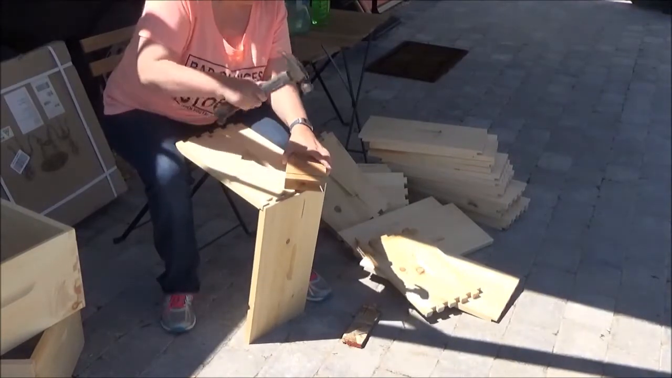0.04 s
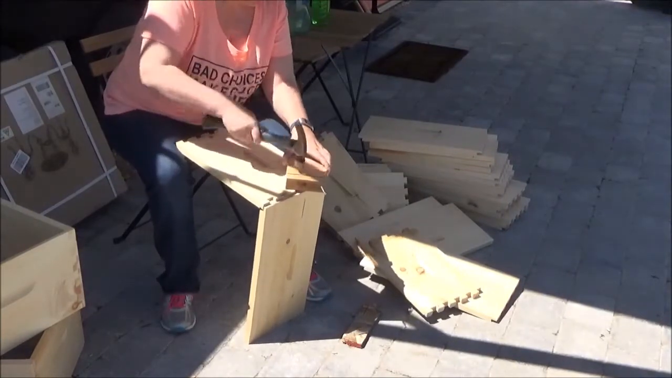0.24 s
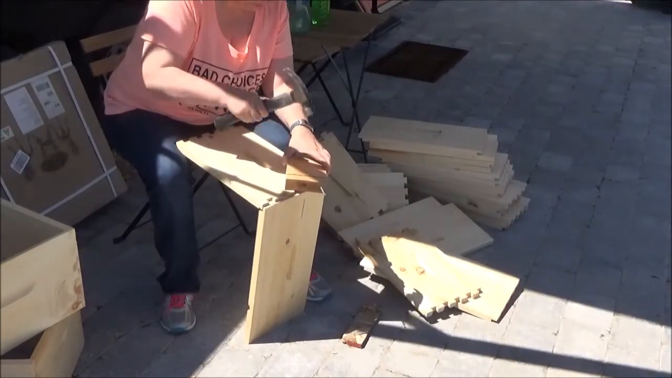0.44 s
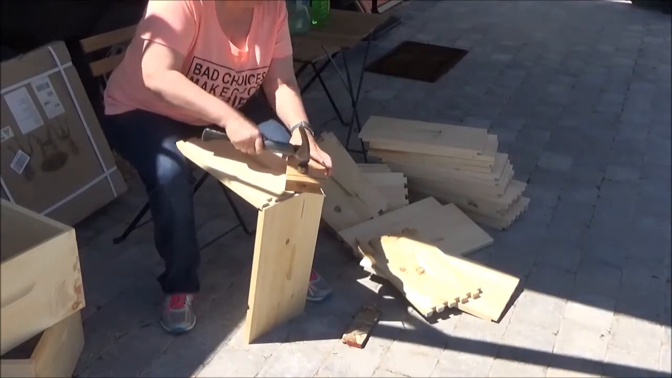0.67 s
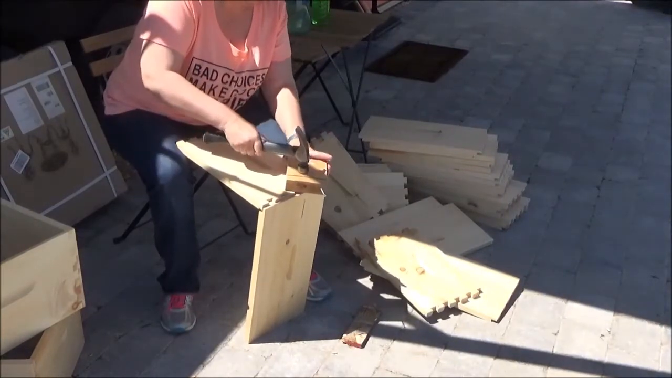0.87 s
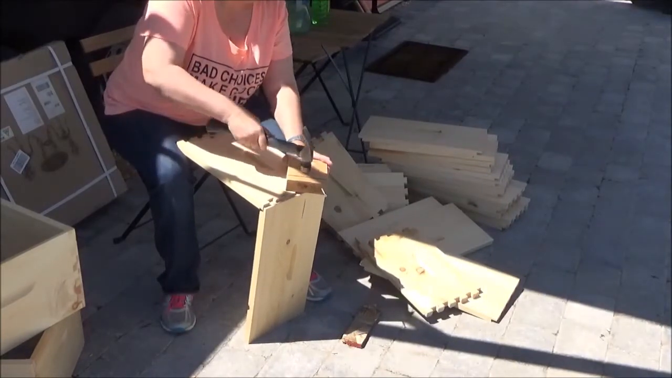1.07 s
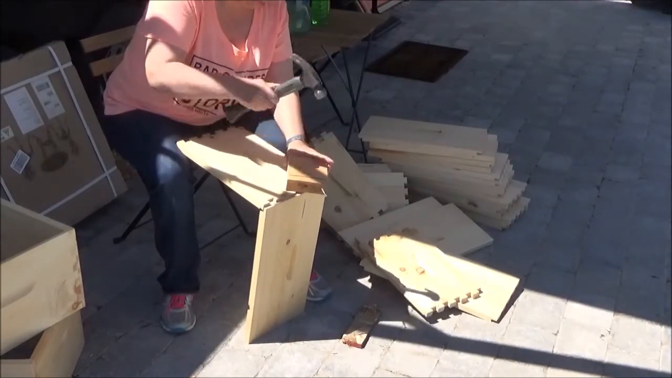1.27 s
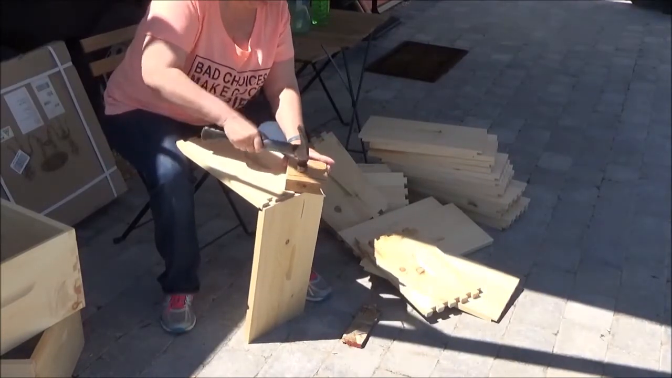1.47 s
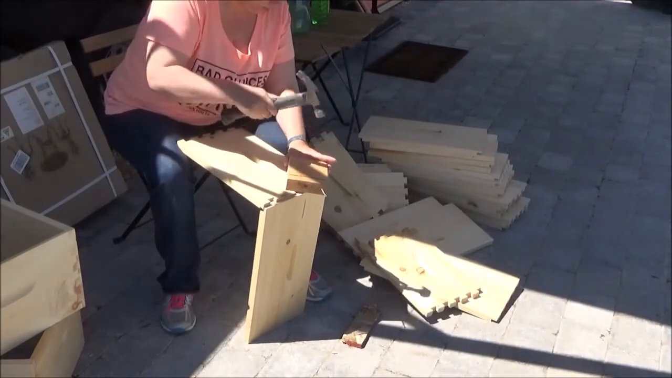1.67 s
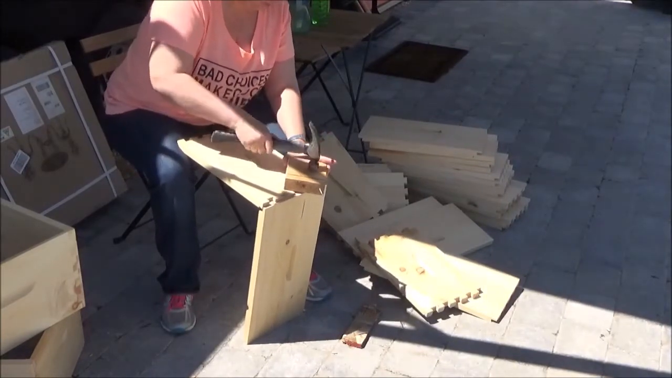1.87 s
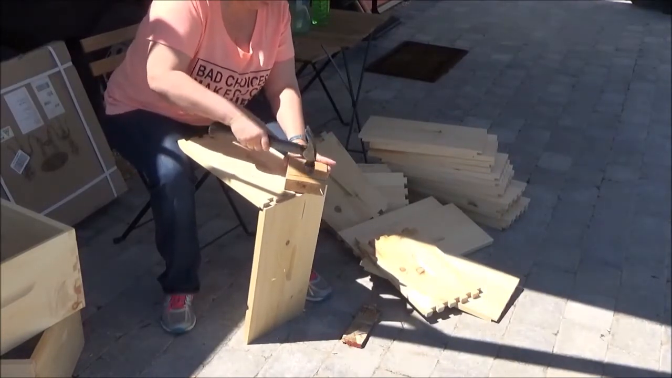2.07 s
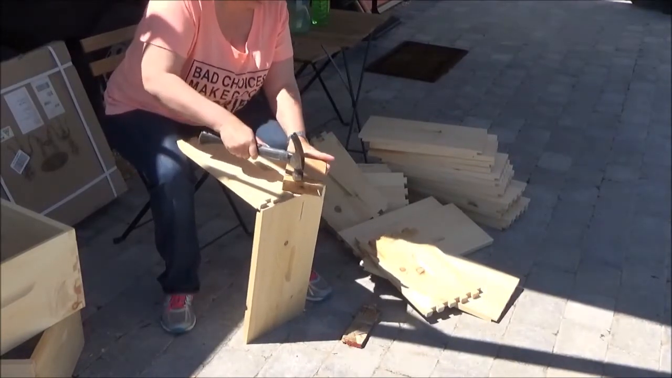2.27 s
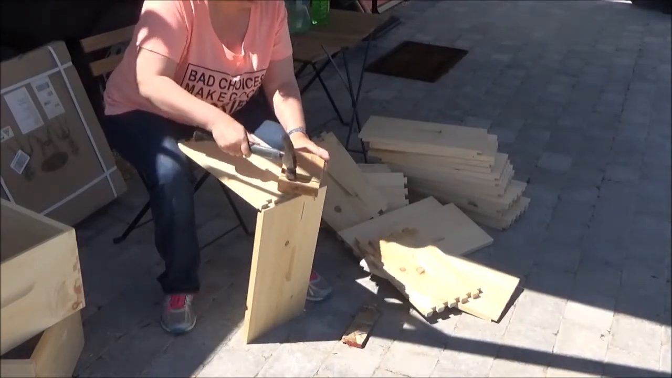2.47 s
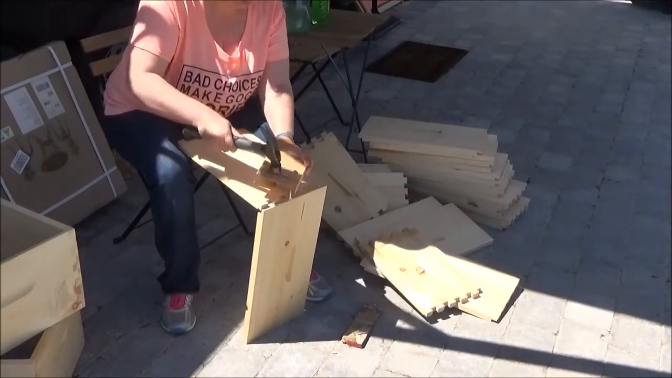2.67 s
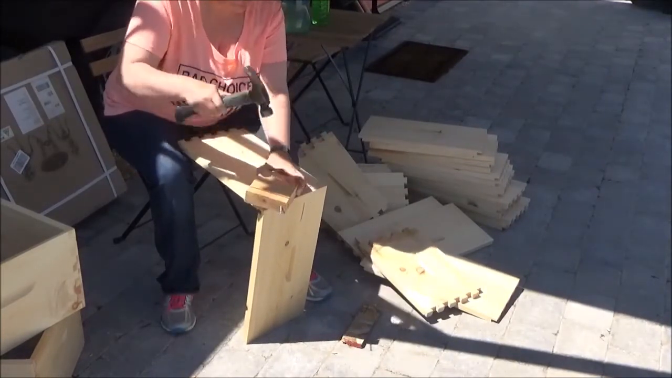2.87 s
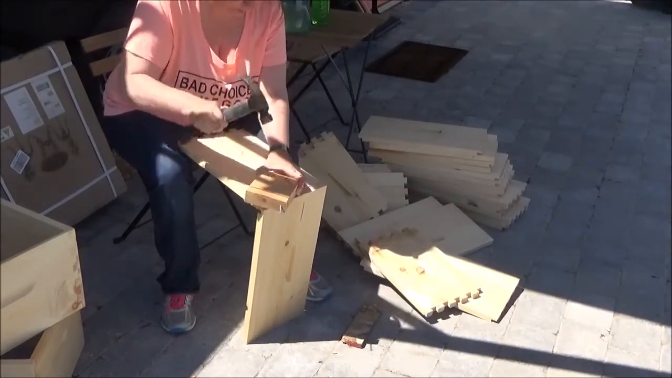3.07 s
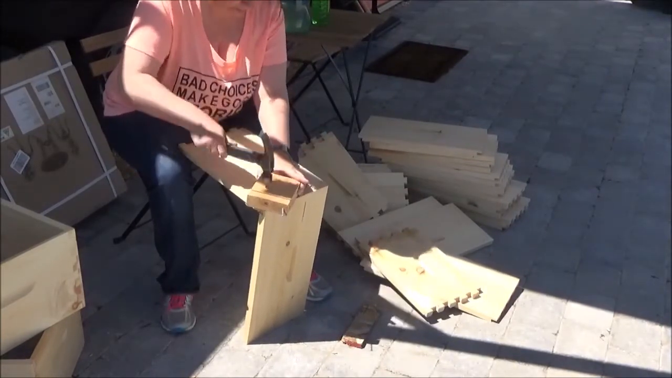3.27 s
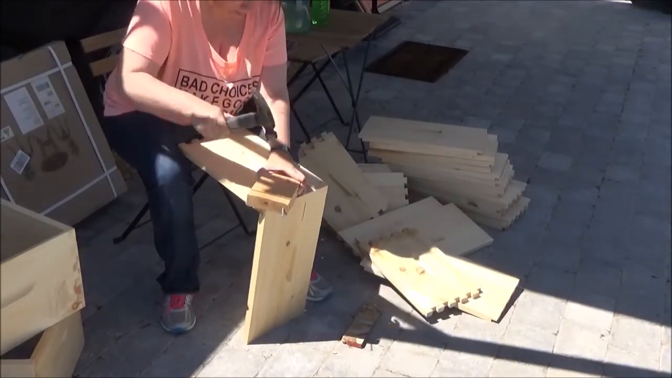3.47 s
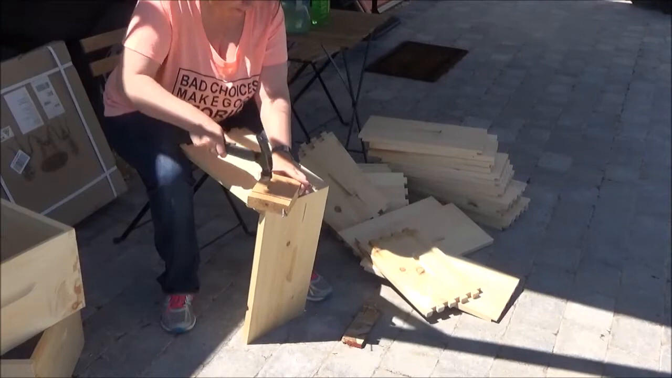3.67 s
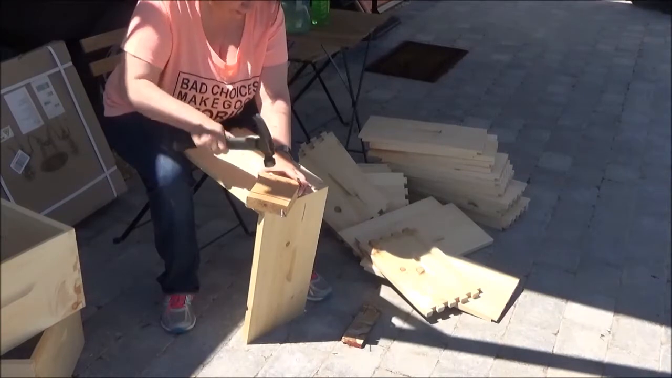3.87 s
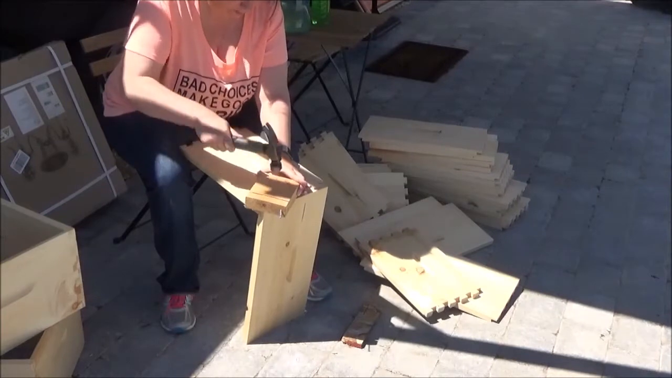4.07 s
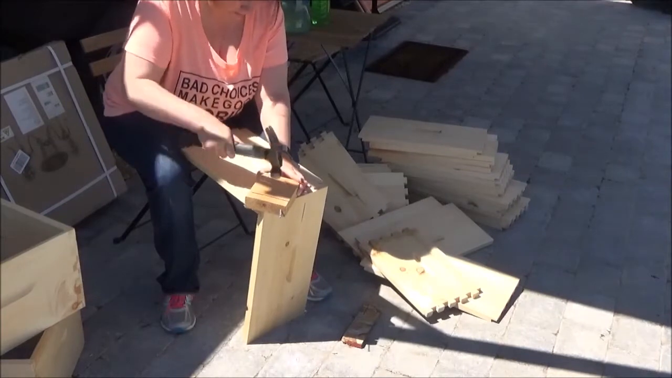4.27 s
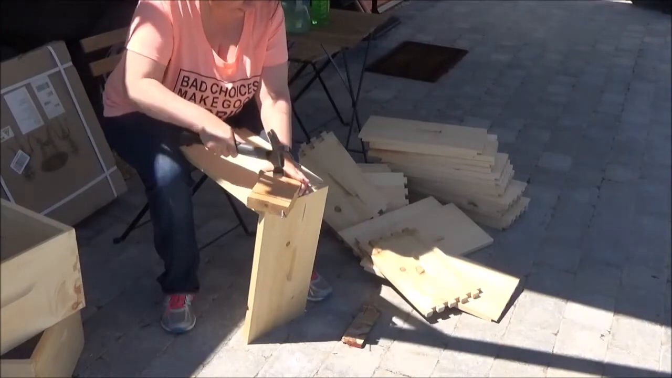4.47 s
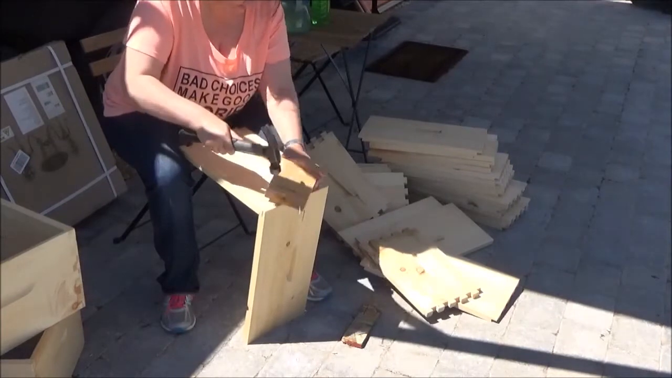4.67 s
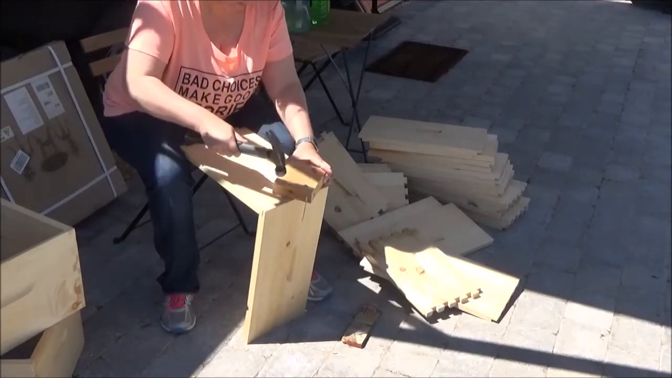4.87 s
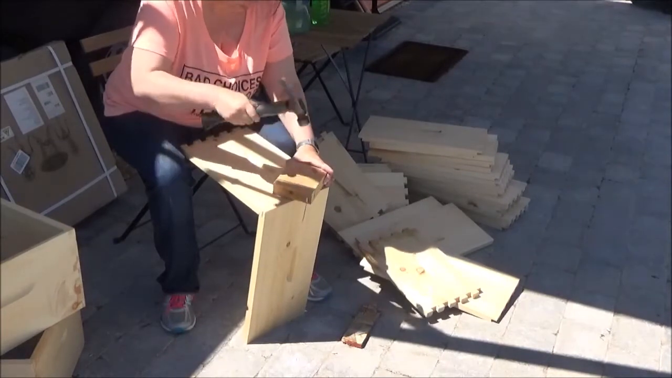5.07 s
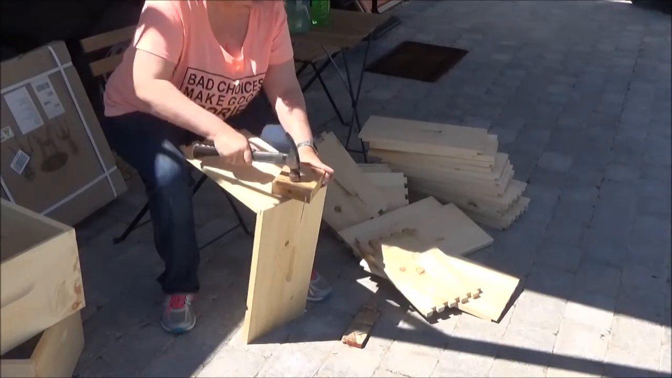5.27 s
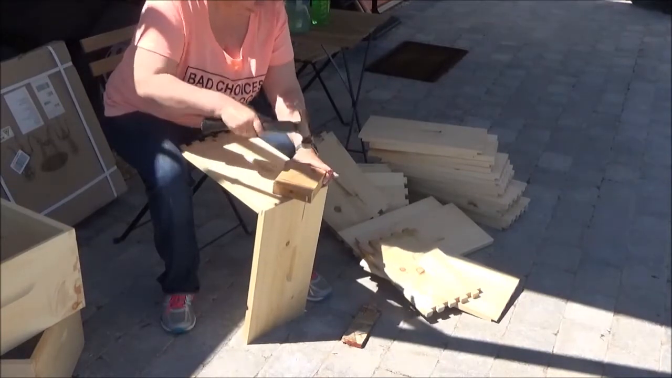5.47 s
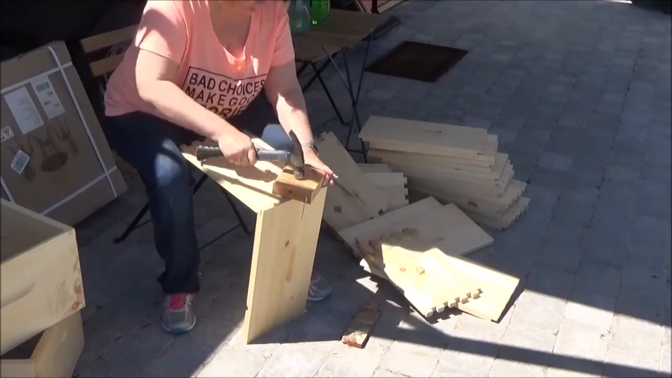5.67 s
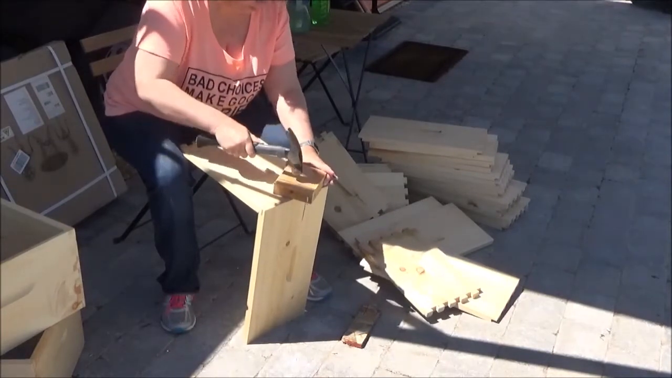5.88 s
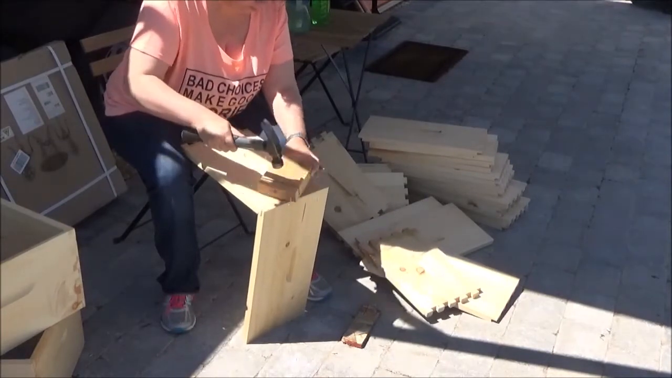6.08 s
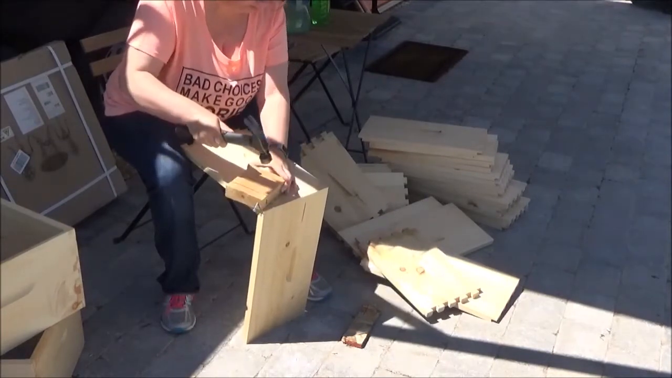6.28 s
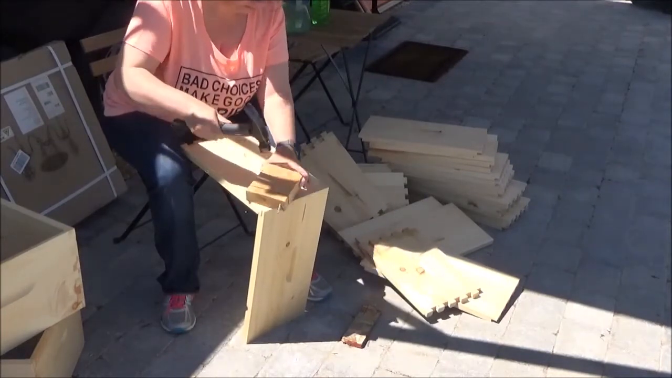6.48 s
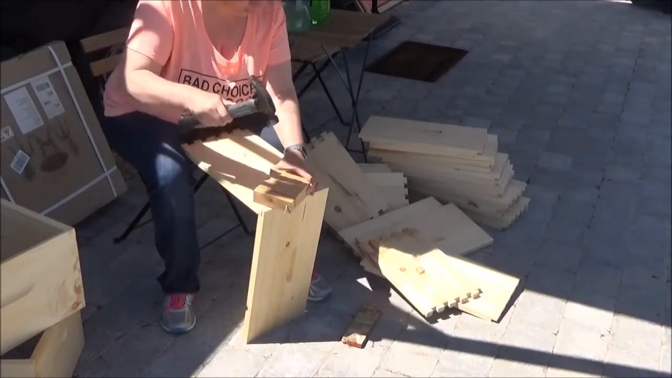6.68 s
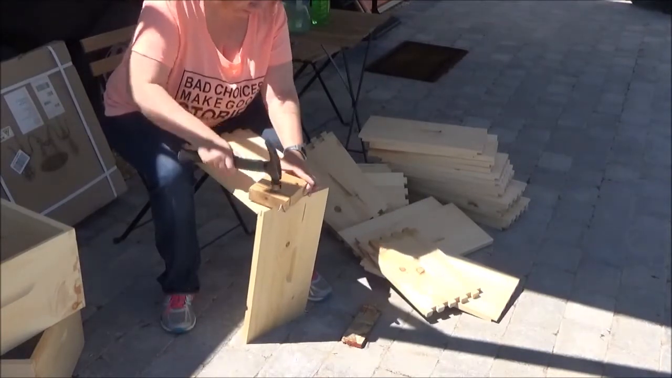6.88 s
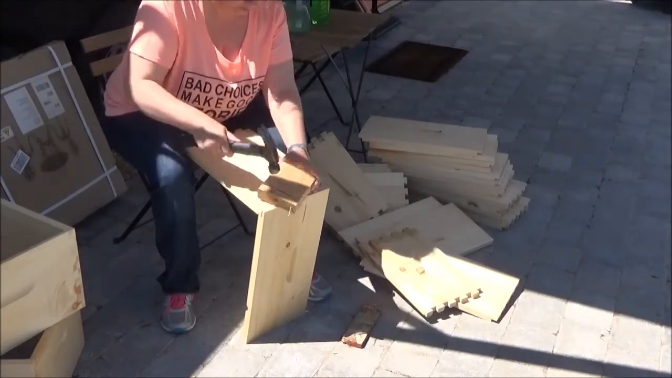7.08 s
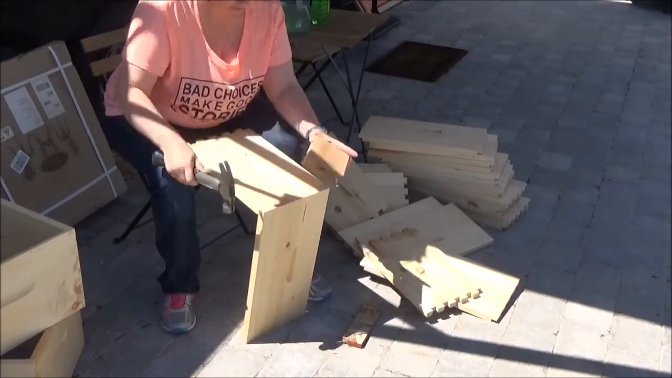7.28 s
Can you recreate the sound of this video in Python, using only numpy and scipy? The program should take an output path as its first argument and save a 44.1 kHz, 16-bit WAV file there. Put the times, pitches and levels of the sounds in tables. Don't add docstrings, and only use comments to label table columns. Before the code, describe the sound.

Sharp, hard woody hammer blows, unevenly spaced, ring in a close reflective space; a loose block bounces and scrapes between them over quiet hiss.

```python
import sys
import numpy as np
from scipy import signal
from scipy.fft import rfft, irfft, next_fast_len
from scipy.io import wavfile
from scipy.ndimage import map_coordinates

SR = 44100
rng = np.random.default_rng(int(sys.argv[2]) if len(sys.argv) > 2 else 0)


def to_wav(sig):
    pcm = np.clip(np.atleast_2d(sig), -1, 1) * 32767
    pcm = np.round(pcm).astype(np.int16)
    wavfile.write(sys.argv[1], SR, pcm.T)


def volts(x):
    e = np.asarray(x, float) / 20
    return 10 ** e


N = 323686

# time in seconds, strength in dB,
# steel crack in dB, box boom in dB, top board tone in Hz.
BLOWS = [
    [(.141, -16, 2, 7, 720), (.532, -11.5, 4.5, -11, 940), (1.432, -14.5, 4, -6, 700),
     (1.83, -15, 0.5, -6.5, 640)],
    [(3.152, -15, 3, 3, 480)],
    [(3.556, -18.5, -1, 0, 508), (3.931, -16, 1.5, 5, 577), (4.317, -14.5, 2, 4, 540)],
    [(5.283, -13.5, 6, -8, 560), (5.676, -18.5, 6.5, 9, 450)],
    [(6.859, -13, -1.5, -2, 600)],
]
# tone in Hz, width in Hz, level in dB.
WOOD = [
    [(600, 100, -4), (1750, 200, -10), (2020, 120, -4), (2380, 60, -10), (2914, 200, -5), (4900, 60, -15)],
    [(1060, 150, 4), (1280, 200, 6), (3500, 40, -16), (4300, 200, -18), (5100, 40, -15)],
    [(1200, 50, 3), (1500, 84, -0.5), (1774, 80, -4), (2010, 60, -9), (3570, 100, -14), (5050, 40, -18)],
    [(1555, 70, 1), (1850, 80, -2), (2160, 60, -5), (2360, 40, -12.5), (3150, 120, -4), (4360, 60, -20)],
    [(1230, 60, -1), (1560, 150, 1), (2110, 110, -2), (2400, 60, -8), (3050, 110, -21)],
]
# damped tone in Hz, width in Hz,
# share taken away from 0 to 1, top board level in dB, build-up of the box in seconds.
DAMPING = [(1200, 350, .55, 1.5, .01), (780, 250, .2, 1.5, .004), (850, 300, .1, -1, .017),
           (760, 250, .6, 1.5, .02), (950, 200, .45, -5, .006)]
# frequency in Hz, level in dB per Hz.
KNOCK = [(50, -51), (171, -13), (281, -9), (451, 0), (720, 1), (1200, -2), (2210, -3), (3000, -5),
         (4260, -10.5), (5600, -17.5), (6250, -32.5), (6990, -25), (11000, -25), (14000, -25)]
# time in seconds, peak in dB, board tone in Hz, hardness in dB.
TOUCHES = [(2.033, -39, 708, -23), (2.19, -19, 700, -3), (2.214, -23, 790, -13), (2.228, -29, 340, -10.5),
           (2.857, -11, 600, -8), (2.867, -11, 600, -18), (2.894, -19.5, 600, 4.5), (2.913, -29, 594, 2.5),
           (2.955, -24, 613, -8), (2.976, -34.5, 505, -16), (3.131, -52, 704, 11.5), (3.357, -52, 563, -13),
           (4.305, -41, 1410, -10), (4.845, -33, 586, -7.5), (4.87, -13, 655, -16), (5.155, -52, 796, 3),
           (6.211, -38, 342, -11), (6.233, -43, 350, -14), (6.255, -42, 400, -9), (6.293, -28.5, 603, -20),
           (6.647, -54, 500, -10), (6.697, -47, 380, -14), (6.714, -39, 446, -10), (6.92, -11, 680, -20),
           (7.042, -33.5, 603, -11)]
# time in seconds, peak in dB, tone in Hz.
THUDS = [(2.228, -30, 270), (2.235, -37, 186), (2.856, -21, 375), (2.971, -39, 174), (4.872, -38, 180)]
# tone in Hz, level in dB, time to fall 60 dB in seconds.
BLOCK_TONES = [(569.7, -5, 0.067), (400, -15, 0.055), (934, -12.5, 0.069), (1288, -14, 0.048),
               (1655, -6, 0.055), (2130, -11, 0.02), (2394, -2, 0.02), (2953, -9, 0.031),
               (4100, -17.5, 0.024)]
# start in seconds, length in seconds, board tone in dB, block tone in dB.
STROKES = [(6.151, 0.15, -47, -51), (6.4, .075, -62, -48), (6.465, 0.064, -55, -50)]
# frequency in Hz, time to fall 60 dB in seconds.
SHED_DECAY = [(150, 0.26), (600, 0.28), (2500, 0.26), (6000, 0.28), (10000, 0.26)]
# delay in seconds, level in dB, time to fall 60 dB in seconds, lowest Hz returned.
ECHOES = [(.066, -11, 0.03, 300), (0.092, -17, 0.026, 1500), (.144, -19.5, 0.088, 4040),
          (.243, -34, 0.72, 1200)]
# time in seconds, nearness in dB.
TRAFFIC = [(0, 4.5), (.8, 0.5), (1.22, 2.5), (1.45, -1), (2.8, 2), (4.7, -5.5), (7.34, 0)]
# frequency in Hz, level in dB per Hz.
HUM = [(12, -50), (20, -20), (43, 7), (65, 3), (78, -1), (92, 21.5), (125, -3), (150, -11), (200, -41),
       (330, -120)]
# frequency in Hz, level in dB per Hz.
HISS = [(60, -16), (130, -1), (220, -5.5), (400, -3), (700, -2), (1500, -7), (3000, -9), (5000, -9),
        (5600, -14.5), (6200, -23), (7000, -15.5), (11000, -22), (12000, -15.5)]
# frequency in Hz, likeness from 0 to 1.
HISS_ALIKE = [(60, 0.99), (220, 0.97), (840, 0.74), (3130, 0.64), (11700, 0.58)]
# frequency in Hz, left over right in dB.
LEFT_DB = [(110, -0.5), (500, 1.34), (2000, 2), (9000, -0.5)]


def unit(x):
    return x / np.sqrt(np.mean(x ** 2) + 1e-20)


def along(points, hz):
    f, value = np.transpose(points)
    return np.interp(np.log(hz + 1), np.log(f + 1), value)


def curves(rows):
    s, *columns = np.transpose(rows)
    return [np.interp(np.arange(N) / SR, s, column) for column in columns]


def filtered(x, response):
    m = next_fast_len(x.shape[-1] + 8192)
    spectrum = rfft(x, m) * response(np.fft.rfftfreq(m, 1 / SR))
    return irfft(spectrum, m)[..., :x.shape[-1]]


def causal(db):
    cepstrum = irfft(np.log(volts(db) + 1e-6))
    cepstrum[1:len(db) - 1] *= 2
    cepstrum[len(db):] = 0
    return np.exp(rfft(cepstrum))


def tone(f, hz, width_hz):
    return 1j * f * width_hz / (hz * hz - f * f + 1j * f * width_hz)


def pair(size, alike):
    def shares(hz):
        turn = np.arccos(np.clip(along(alike, hz), -1, 1)) / 2
        return np.array([np.cos(turn), np.sin(turn)])

    mid, side = filtered(rng.standard_normal((2, size)), shares)
    return np.array([mid + side, mid - side])


def hammer():
    out = np.zeros((2, N))
    for modes, damping, blows in zip(WOOD, DAMPING, BLOWS):
        for blow in blows:
            add_blow(out, modes, damping, blow)
    return out


def add_blow(out, modes, damping, blow):
    t = np.arange(SR) / SR
    dip_hz, dip_width_hz, share, board_db, build_s = damping
    s, db, steel_db, boom_db, board_hz = blow
    rung = [(hz, width_hz, level + 2.5 * rng.normal()) for hz, width_hz, level in modes]
    rung = [(board_hz, 130, board_db)] + rung

    burst = volts(-5 - 60 * t / 0.059) * rng.standard_normal(SR)
    answer = shed([(110, 0.87), (300, 0.92), (650, 0.91), (7000, 0.83)], length=1.046)
    sound = (burst + answer) * (1 - np.exp(-t / 0.0011))
    sound *= 1 - 0.62 * np.exp(-t / build_s)

    def wood(f):
        gain = 1 - min(share, 0.9) * tone(f, dip_hz, dip_width_hz)
        gain = gain + volts(boom_db) * tone(f, 182, 62)
        for hz, width_hz, level in rung:
            over_knock_db = min(level + 1.2 - along(KNOCK, hz), 9 - hz / 450)
            gain = gain + volts(over_knock_db) * tone(f, hz, max(width_hz, 0.029 * hz))
        return gain

    def colour(f):
        steel = steel_db * np.clip((f - 3200) / 3800, 0, 1)
        return causal(along(KNOCK, f) + steel) * wood(f)

    add(out, s - 0.0011, volts(db + 13.5) * filtered(sound, colour))
    # a 38 Hz sway, drifting apart left and right
    drift = np.array([[0], [0.9]]) * (1 - np.exp(-t / 0.01))
    add(out, s, volts(db - 37 - 60 * t / 0.12) * np.sin(2 * np.pi * 38 * t + drift))


def block():
    out = np.zeros((2, N))
    for s, db, hz, hard_db in TOUCHES:
        board_t60 = max(0.062 + 0.0011 * (db + 13), 0.02)
        add_touch(out, s, db, hz, hard_db, board_t60, contact_s=0.0025)
    for s, db, hz in THUDS:
        add_touch(out, s, db, hz, hard_db=-25, board_t60=16.6 / hz, contact_s=0.0043)

    out = filtered(out, lambda f: (1j * f / (90 + 1j * f)) ** 2 / (1 + 1j * f / 6500) ** 2)
    answer = shed([(110, 0.97), (7000, 0.24)], length=0.57)
    answer /= np.linalg.norm(answer[0])
    return out + volts(-10) * signal.fftconvolve(out, answer, axes=1)[:, :N]


def add_touch(out, s, db, board_hz, hard_db, board_t60, contact_s):
    t = np.arange(SR // 4) / SR
    ring = np.sin(2 * np.pi * board_hz * t) * volts(-60 * t / board_t60)
    for hz, level, t60 in BLOCK_TONES:
        bright = (hard_db + 5.5) * np.clip((hz - 750) / 850, 0, 1)
        waver = np.cumsum(rng.standard_normal(len(t))) * 0.18 * np.clip((hz - 700) / 1000, 0, 1)
        fade = volts(level + bright + rng.normal(0, 1.4) - 60 * t / t60)
        ring += fade * np.sin(2 * np.pi * hz * t * rng.normal(1, 0.031) + waver)
    click = filtered(rng.standard_normal(len(t)),
                     lambda f: tone(f, 1160, 1100) * tone(f, 1300, 2800) * tone(f, 2300, 6000))
    knock = ring + volts(hard_db + 2 - 60 * t / 0.065) * click
    knock *= 1 - np.exp(-t / contact_s)
    add(out, s - 0.0005, volts(db + 3.5) * np.array([knock, knock]))


def slide():
    t, out = np.arange(N) / SR, np.zeros(N)
    unevenness = map_coordinates(rng.standard_normal(N // 400 + 4), [np.arange(N) / 400])
    slips = rng.standard_normal(N) * volts(3 * unevenness)
    for s, length, *levels in STROKES:
        stroke = np.clip(np.minimum(t - s, s + length - t) / 0.015, 0, 1)
        for db, hz, width_hz in zip(levels, (605, 1320), (120, 150)):
            scrape = unit(filtered(slips, lambda f: tone(f, hz, width_hz) ** 2))
            out += stroke * volts(db - 5.5) * scrape
    return out


def shed(alike, length=1):
    t = np.arange(SR) / SR
    hz, frame_s, z = signal.stft(pair(SR, alike), SR, nperseg=256)
    decay = volts(-60 * frame_s / length / along(SHED_DECAY, hz)[:, None])
    tail = signal.istft(z * decay, SR, nperseg=256)[1][:, :SR]
    jumps = np.repeat(rng.standard_normal(SR // 40 + 1), 40)[:SR]
    tail *= volts(3.6 * jumps * np.exp(-t / 0.13))
    far = pair(SR, alike)
    for s, db, t60, low_hz in ECHOES:
        age = np.maximum(t - s, 0) / t60
        swell = np.minimum(age / 0.029, 1)
        tail += volts(db - 60 * age) * swell * filtered(far, lambda f: f / np.hypot(f, low_hz))
    return tail


def add(track, s, sound):
    part = track[:, round(s * SR):][:, :sound.shape[1]]
    part += sound[:, :part.shape[1]]


def air():
    near_db, = curves(TRAFFIC)
    hum_db = -66 + near_db
    hiss_db = -49 + 0.2 * near_db
    swell = map_coordinates(rng.standard_normal(N // 5000 + 4), [np.arange(N) / 5000])
    hum_noise = pair(N, [(32, 0.66), (60, 1.0), (95, 0.97)])
    hum = unit(filtered(hum_noise, lambda f: volts(along(HUM, f))))
    hiss = unit(filtered(pair(N, HISS_ALIKE), lambda f: volts(along(HISS, f))))
    return volts(hum_db + 1.7 + 2 * swell) * hum + volts(hiss_db + 0.73) * hiss


def scene():
    work = hammer() + block() + slide()
    return filtered(work, lambda f: volts(np.outer([0.5, -0.5], along(LEFT_DB, f)))) + air()


def roll_off(x):
    return signal.sosfilt(signal.butter(12, 12300, fs=SR, output="sos"), x)


def record(dry):
    fall = np.exp(-1 / (0.0029 * SR))
    power = signal.lfilter([1 - fall], [1, -fall], (dry ** 2).mean(axis=0))
    ahead = np.roll(np.sqrt(power + 1e-12), -round(0.00141 * SR))
    gain = (1 + (ahead / volts(-20.5)) ** 4) ** -0.22
    held = dry * gain
    held = held / (1 + np.abs(held / 0.48) ** 5) ** 0.28

    def treble_cut(f):
        over_hz = np.clip(f - 11050, 0, None)
        return volts(-np.minimum(over_hz * 0.7, 36 + over_hz * 0.011))

    return roll_off(filtered(held, treble_cut))


dry = scene()
out = record(dry)
to_wav(out)
```